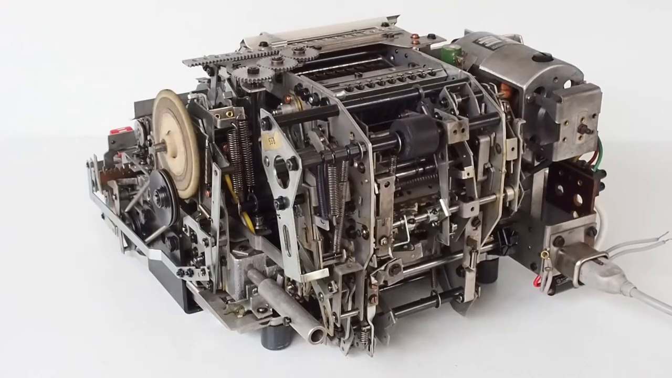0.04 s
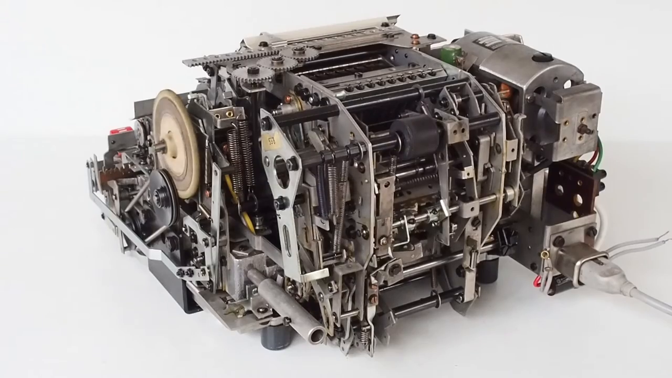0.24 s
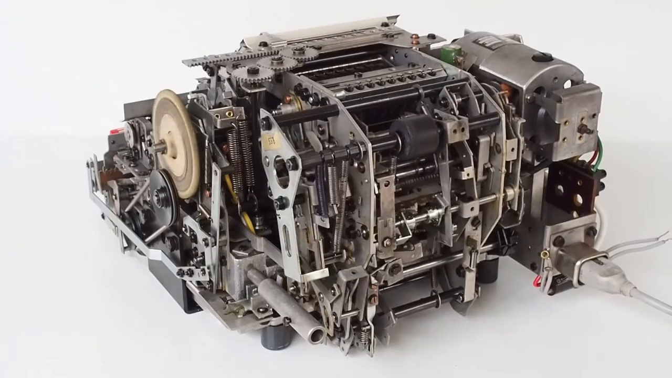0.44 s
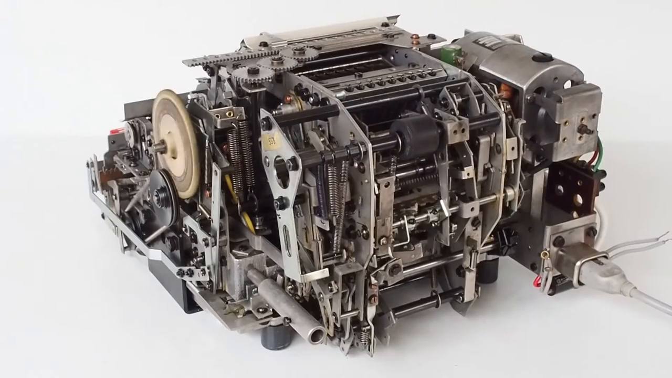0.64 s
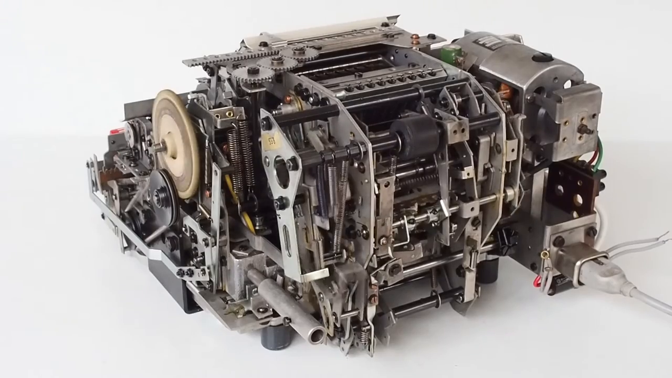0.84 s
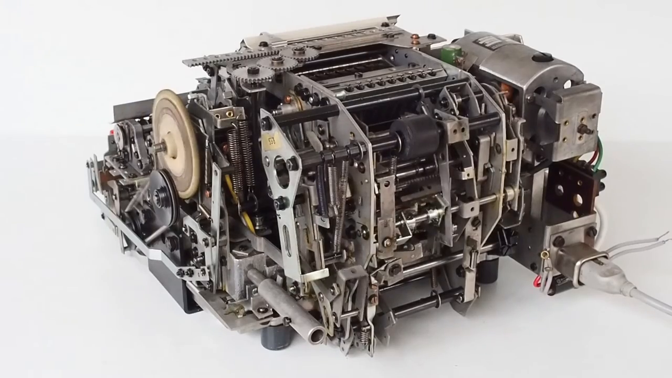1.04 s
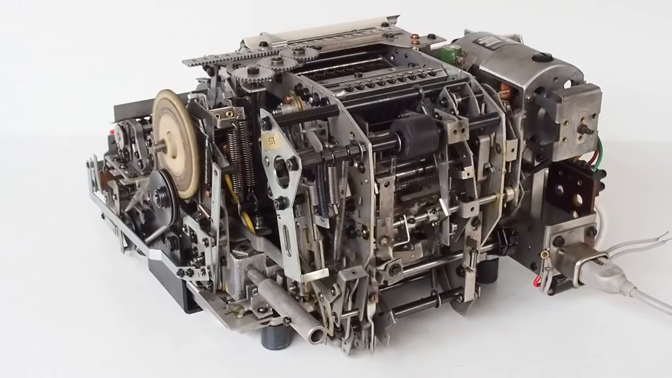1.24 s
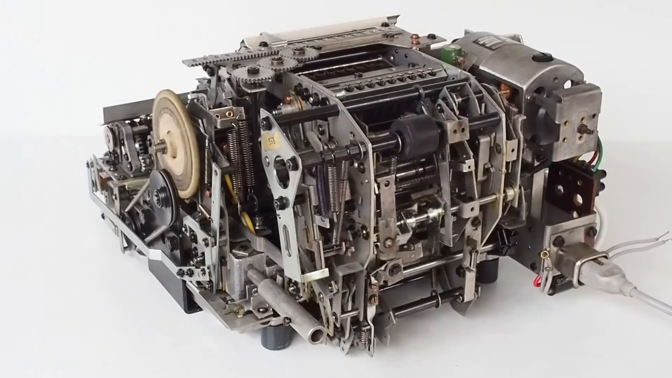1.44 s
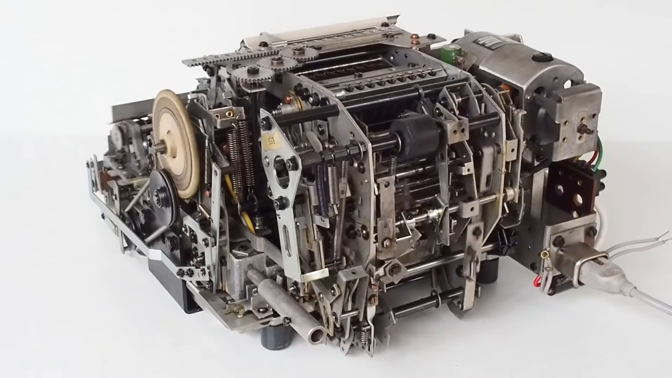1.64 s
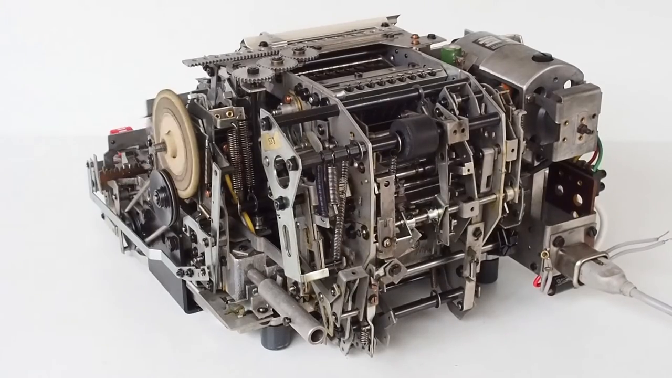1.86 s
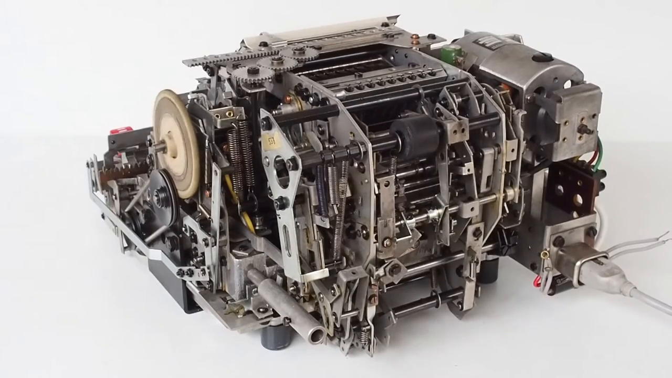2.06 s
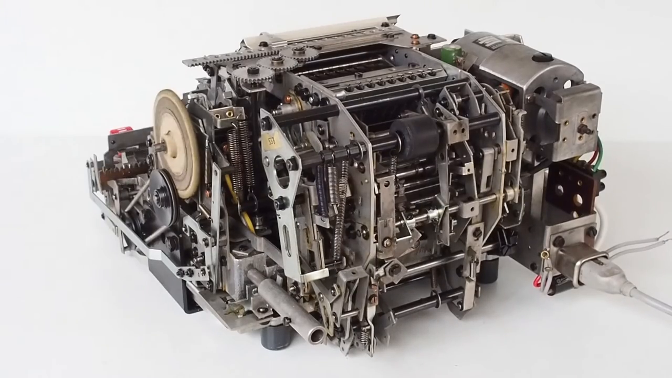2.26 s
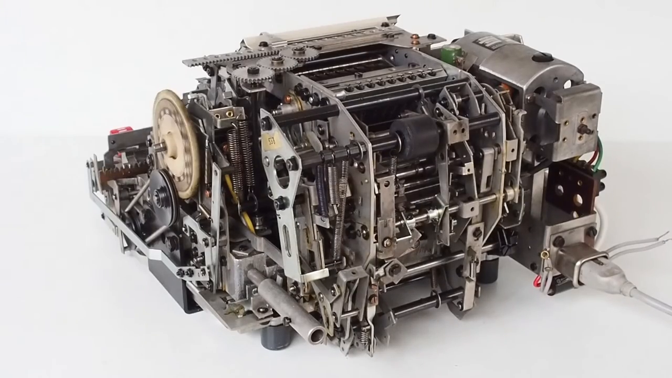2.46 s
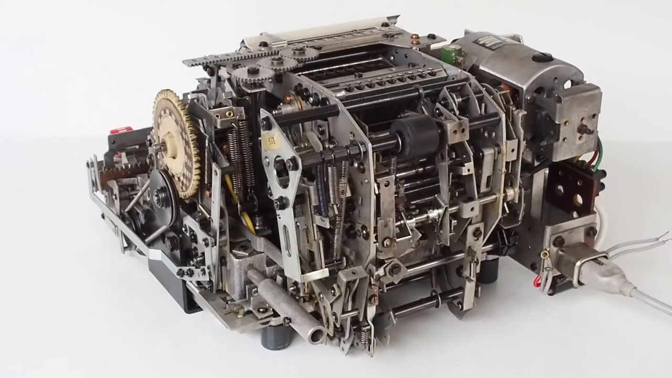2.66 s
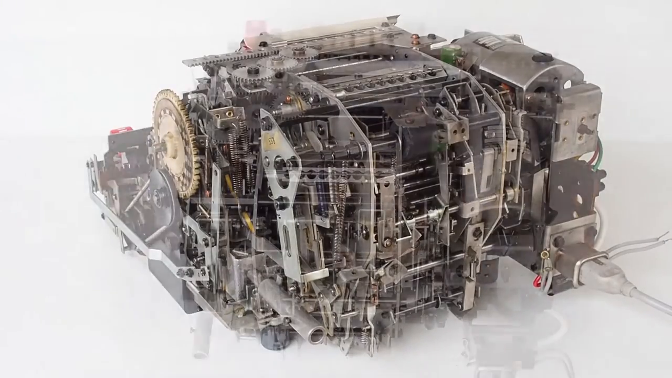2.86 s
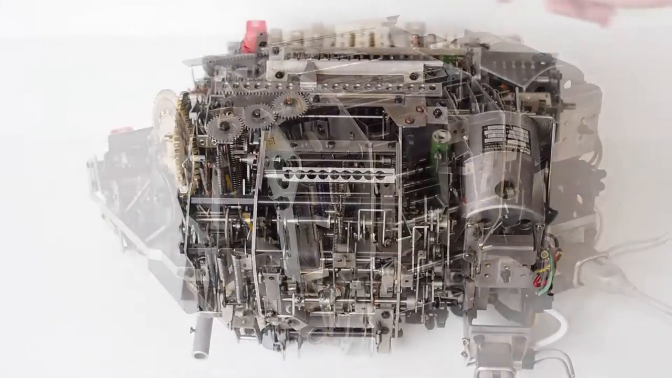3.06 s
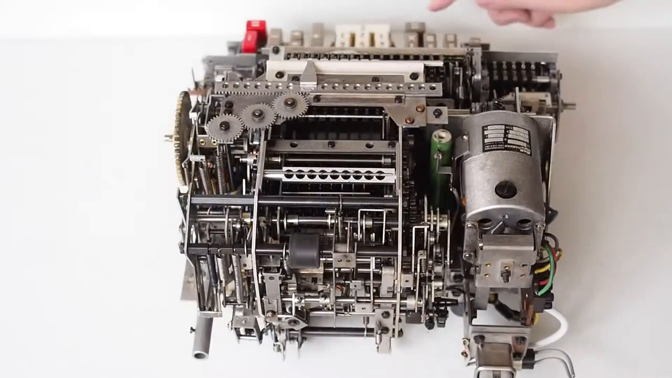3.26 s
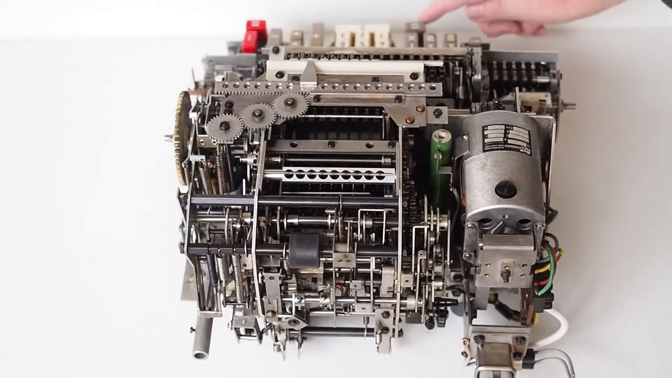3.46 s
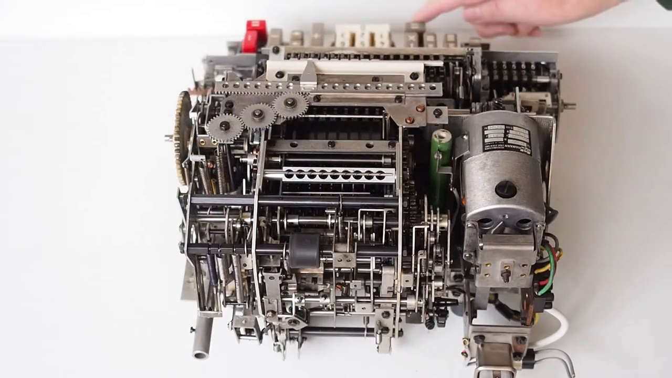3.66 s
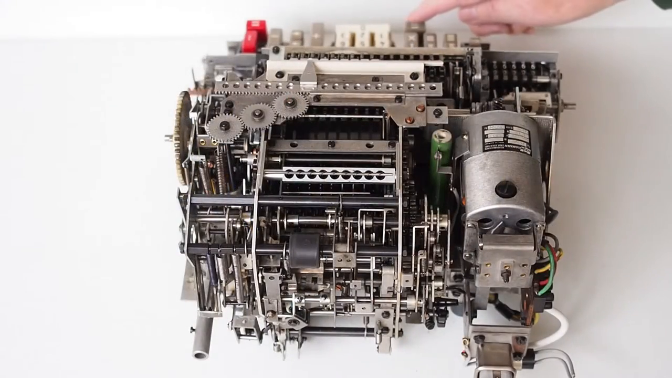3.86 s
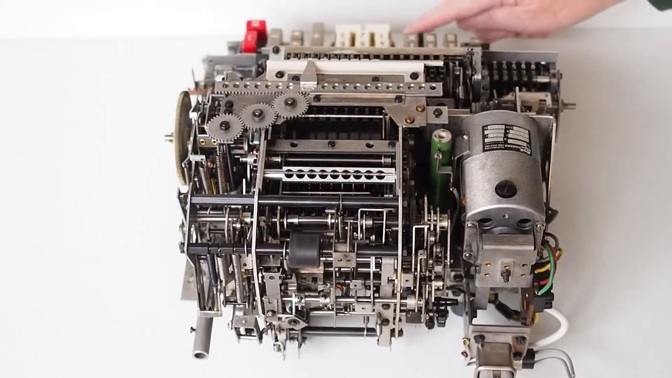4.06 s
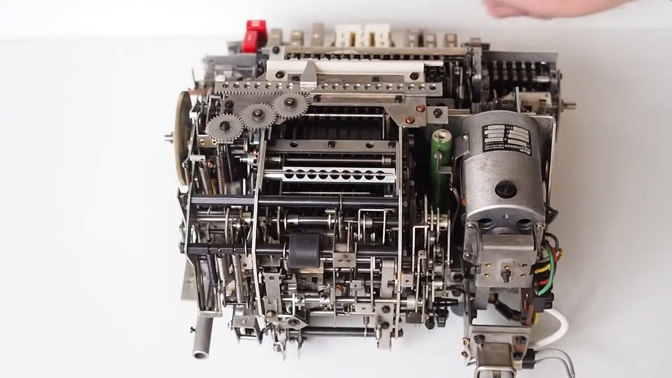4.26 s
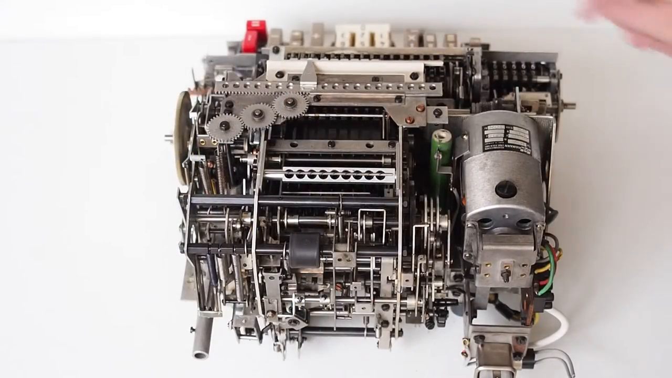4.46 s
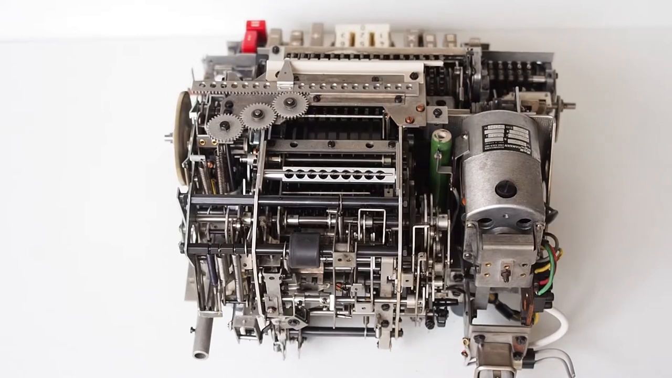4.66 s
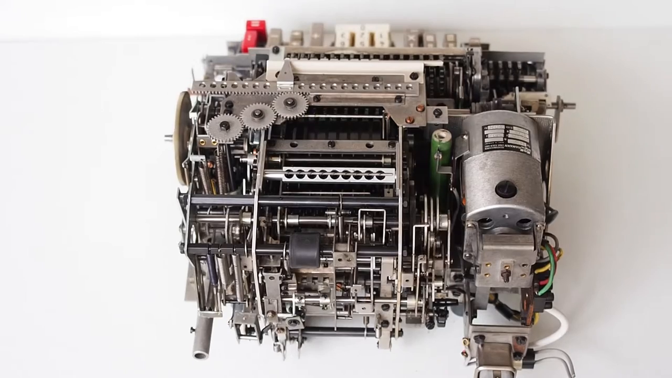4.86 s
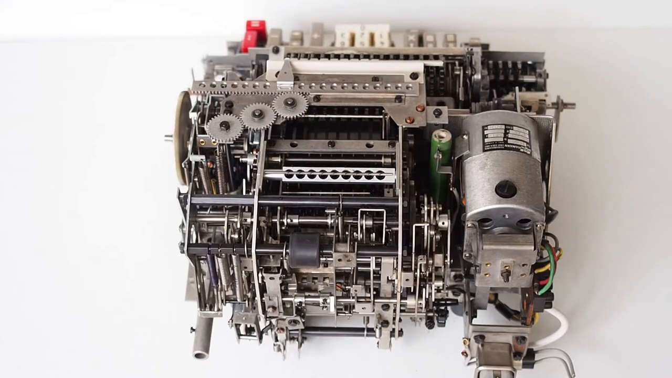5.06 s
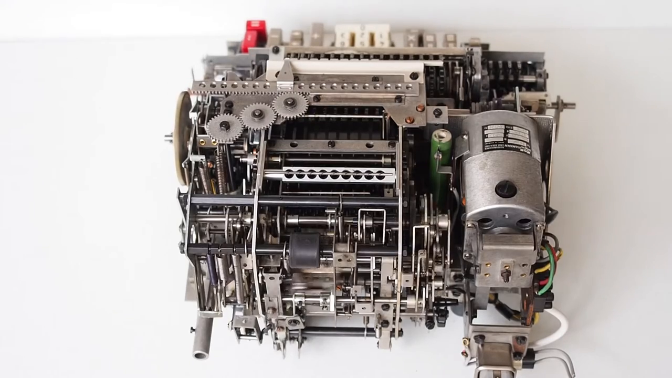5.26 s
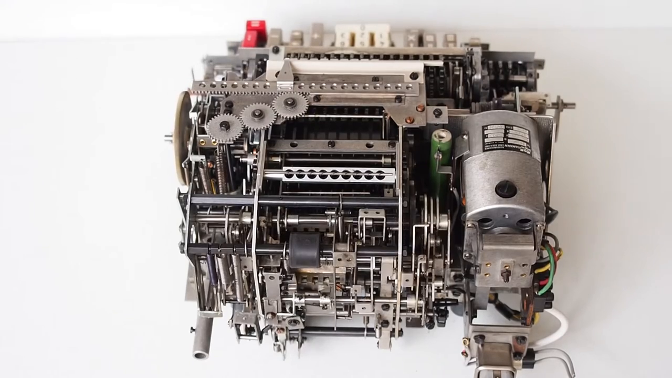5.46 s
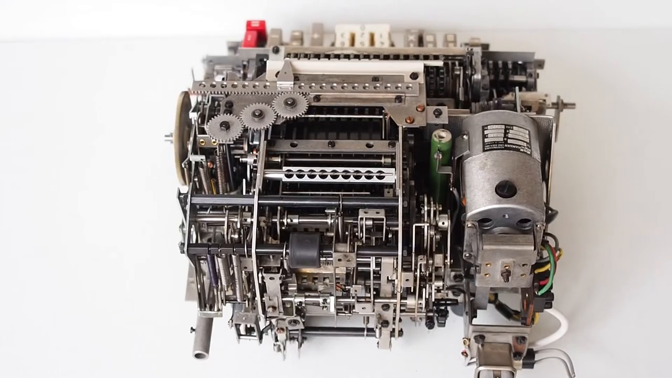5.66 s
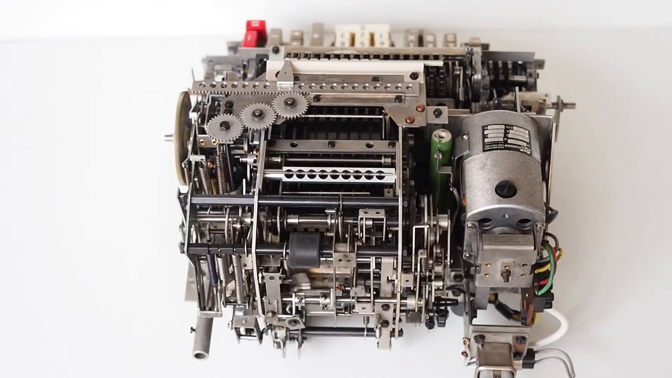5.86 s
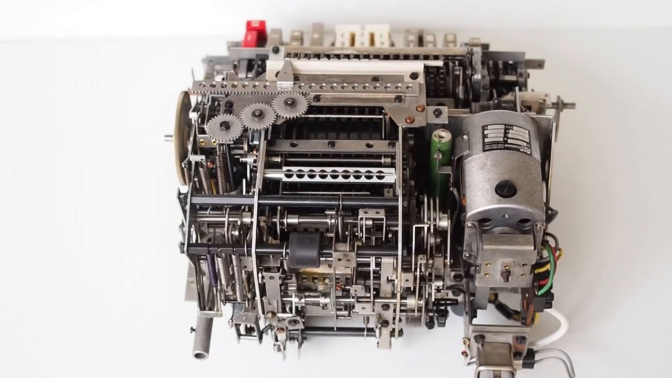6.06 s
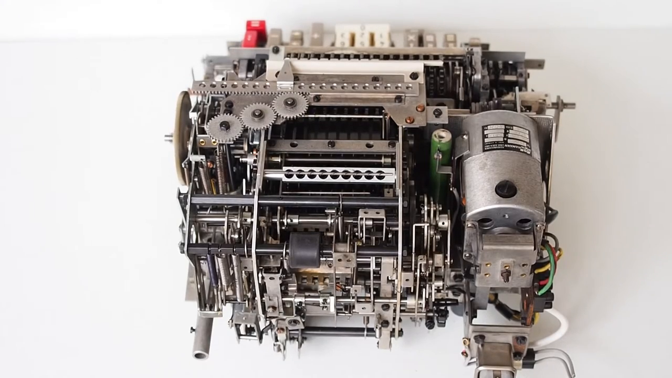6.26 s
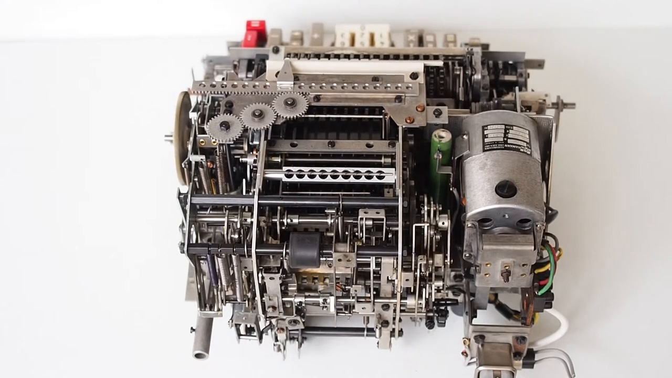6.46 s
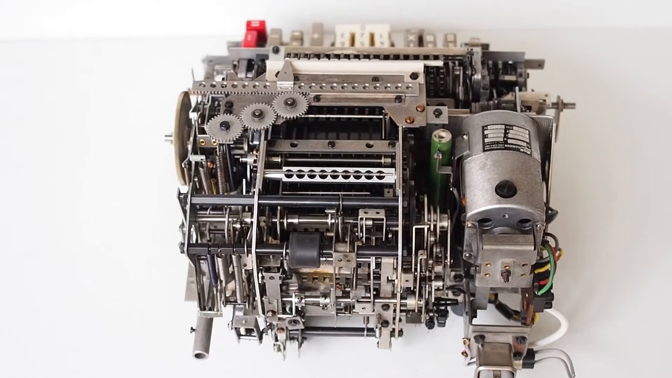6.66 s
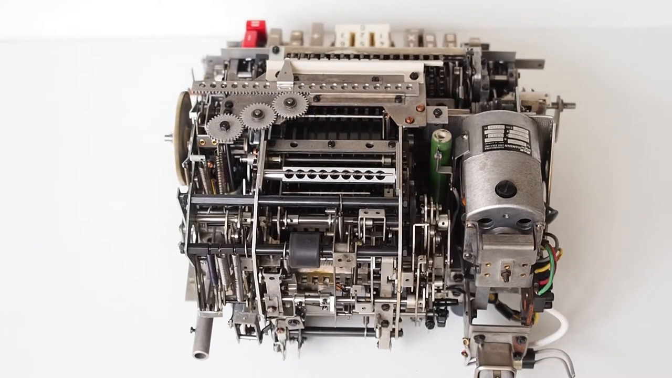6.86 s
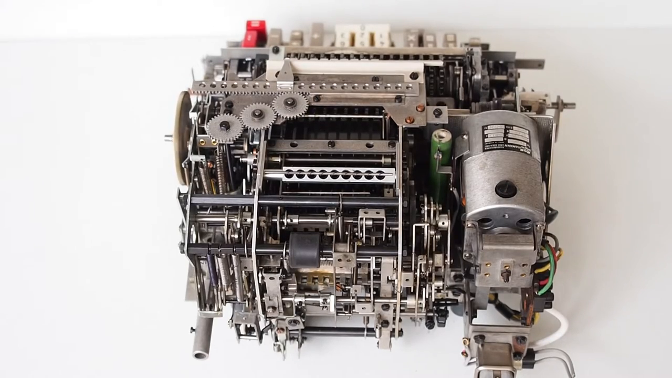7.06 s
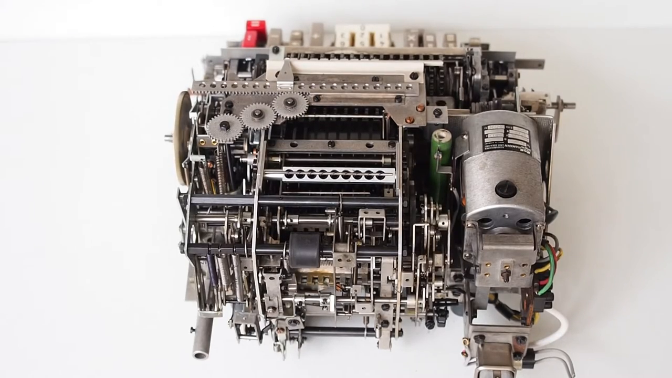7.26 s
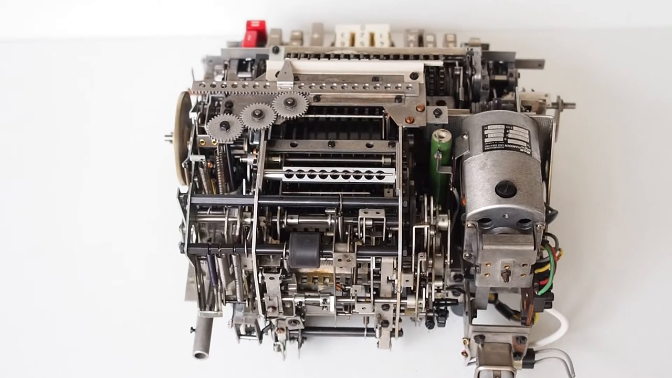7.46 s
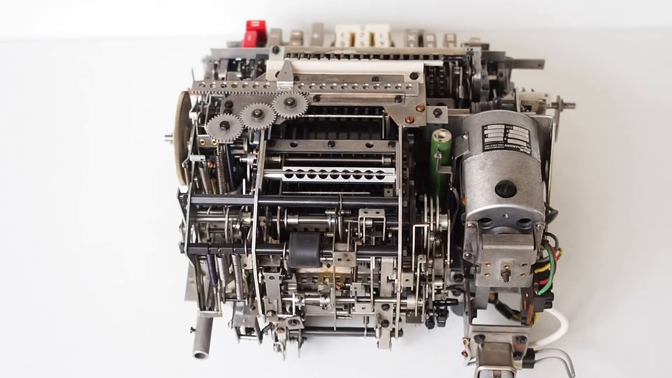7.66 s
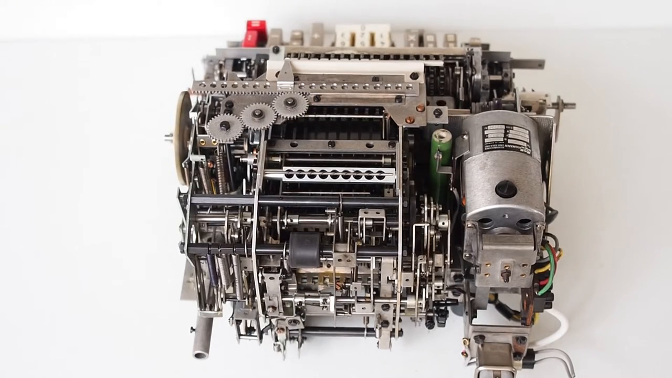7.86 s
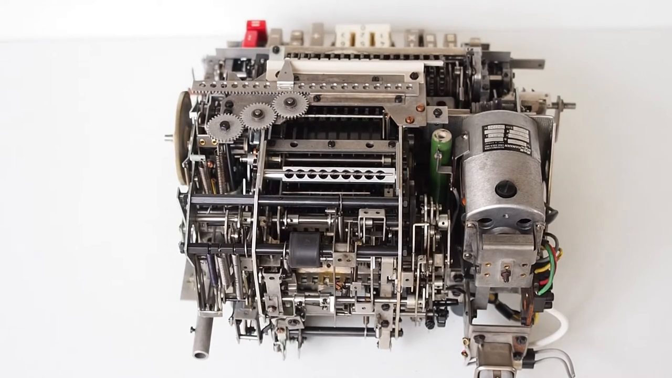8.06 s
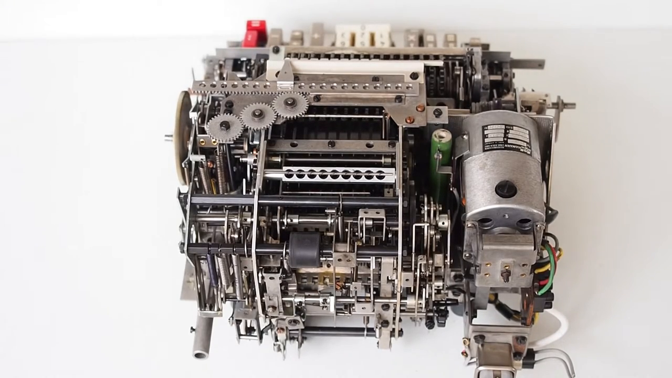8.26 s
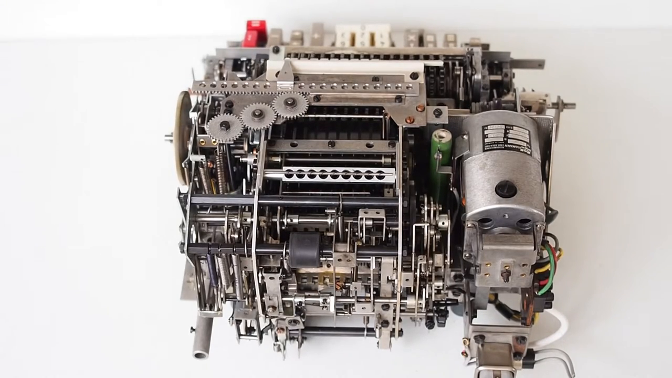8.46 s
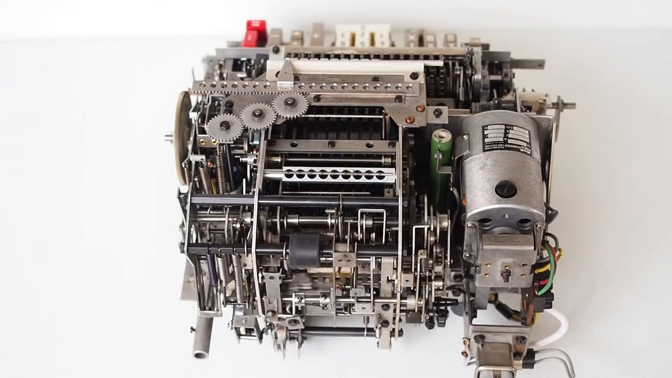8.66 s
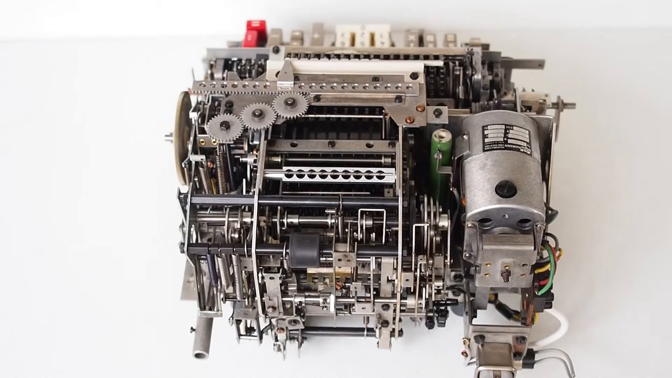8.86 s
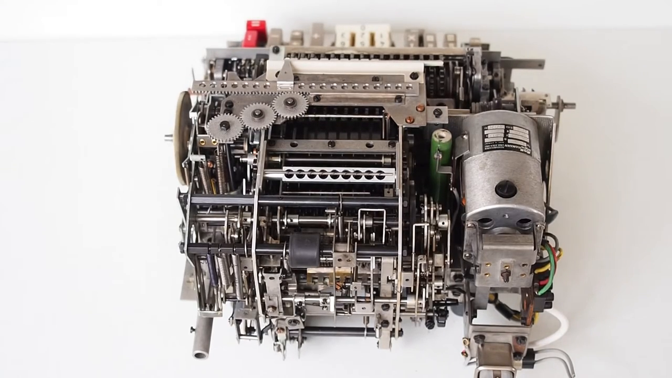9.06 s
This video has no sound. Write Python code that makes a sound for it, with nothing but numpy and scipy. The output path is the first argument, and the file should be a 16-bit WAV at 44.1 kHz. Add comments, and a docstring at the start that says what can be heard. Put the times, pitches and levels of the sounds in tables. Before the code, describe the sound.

Gears whirr and metal levers clack rhythmically as an electric mechanical calculator works, coasts to a stop, and restarts in a quiet room.

```python
"""A motor-driven mechanical calculator, cover off, works on a table in a quiet room. From the start its
motor hums and its gears whirr. Each turn of the main shaft throws rows of steel levers against their
stops, and the side plate booms. Near 2 s the carriage clicks along and hits its stop; the power goes
off and the machine coasts down. Near 4 s a key starts the next calculation: levers set up, the motor
pauses briefly, and from 5 s runs of clattering turns follow one another to the end."""
import sys
import numpy as np
from scipy.fft import rfft, irfft, next_fast_len
from scipy.io import wavfile
from scipy.ndimage import map_coordinates

SR = 44100
rng = np.random.default_rng(int(sys.argv[2]) if len(sys.argv) > 2 else 0)


def unload_audio(sound):
    """Save the sound as a 16-bit wav file, at the path given as the first command line argument."""
    columns = np.transpose(np.atleast_2d(sound))
    # keep every value between -1 and 1, then stretch to whole-number steps
    steps = np.round(np.clip(columns, -1, 1) * 32767)
    wavfile.write(sys.argv[1], SR, steps.astype(np.int16))


N = 402176
T = np.arange(N) / SR
SIZE = next_fast_len(N + SR, real=True)
HZ = np.fft.rfftfreq(SIZE, 1 / SR)
TOP_HZ = 15780


def amp(db):
    """Turn decibels into a number to multiply by."""
    return 10 ** (np.asarray(db) / 20)


def unit(x):
    """Scale a signal to an average power of 1."""
    return x / np.sqrt(np.mean(np.abs(x) ** 2) + 1e-20)


def along(points):
    """Join (pitch_hz, value) points into a curve over all pitches."""
    pitch_hz, values = np.transpose(points)
    return np.interp(np.log(HZ + 1), np.log(pitch_hz + 1), values)


def curves(rows, t=T):
    """Read each column after a table's time column at the times t."""
    time_s, *columns = np.transpose(rows)
    return [np.interp(t, time_s, column) for column in columns]


def wobble(rate):
    """A smooth random curve through `rate` new values a second."""
    return map_coordinates(rng.standard_normal(int(N * rate / SR) + 4), [T * rate])


def filtered(x, response):
    """Make each pitch in x louder or softer, as the response says."""
    return irfft(rfft(x, SIZE) * response, SIZE)[..., :N]


def colour(points):
    """A filter shaped by (pitch_hz, level_db) points that keeps the power of white noise."""
    cepstrum = irfft(np.log(amp(along(points))), SIZE)
    # folding makes the filter ring after a hit, never before it
    cepstrum[1:SIZE // 2] *= 2
    cepstrum[SIZE // 2 + 1:] = 0
    response = np.exp(rfft(cepstrum))
    return response / np.sqrt(np.mean(np.abs(response) ** 2 * (HZ < TOP_HZ)))


def resonances(notes, hz=HZ):
    """A filter that rings at each (pitch_hz, width_hz, level_db); narrow notes ring longer."""
    return sum(amp(db) * 1j * hz * width / (pitch ** 2 - hz ** 2 + 1j * hz * width)
               for pitch, width, db in notes)


# the room's tone: pitch_hz, level_db
ROOM_TONE = [(25, -19), (60, 3), (110, -1), (250, -5), (500, -8), (1500, -17), (2100, -22.5), (3500, -22),
             (5200, -30.5), (6600, -28), (10000, -29), (15500, -36)]
# the swell of its hiss: time_s, level_db
HISS_LEVELS = [(2.7, -51), (3.1, -46), (3.7, -50)]
def air(split_hz=1200, rumble_db=-54):
    """Faint room noise: a steady low rumble under a hiss that swells a little."""
    noise = unit(filtered(rng.standard_normal((2, N)), colour(ROOM_TONE)))
    hiss = filtered(noise, HZ ** 2 / (HZ ** 2 + split_hz ** 2))
    return (noise - hiss) * amp(rumble_db) + hiss * amp(curves(HISS_LEVELS)[0])


# when the motor has no power: off_s, on_s
POWER_OFF = [(2.2, 4.05), (4.811, 4.99)]
def coasting(t=T, spin_up_s=.015):
    """Seconds spent slowing down; the count falls quickly to zero when the power returns."""
    return sum(np.clip(t - off_s, 0, on_s - off_s) * np.exp(-np.maximum(t - on_s, 0) / spin_up_s)
               for off_s, on_s in POWER_OFF)


def motor_turns(full_speed_hz=146.8, sag_hz_per_s=45, sway=.0054):
    """Count the turns of the motor shaft, whose speed sways a little and sags when it coasts."""
    speed_hz = (full_speed_hz - sag_hz_per_s * coasting()) * (1 + sway * wobble(7))
    return np.cumsum(speed_hz) / SR


# how the running parts grow louder and softer: time_s, whirr_db, treble_db, drive_db, hum_db
RUNNING_LEVELS = [(0, -28, -23.5, -39.5, 2), (.6, -32, -28.5, -37.5, 3), (1.5, -32.5, -28.5, -41, 3),
                  (2.1, -32, -28, -37, 3.5), (4.2, -32, -32, -41, -1), (5.3, -33.5, -31, -45.5, 0.5),
                  (9.1, -33, -30.5, -42, 1)]
# the notes of the hum: cycles_per_turn, level_db
HUM_NOTES = [(1, -63), (2, -58), (3, -58)]
# the tone of the rumbling table: pitch_hz, level_db
TABLE_TONE = [(25, -12.5), (55, -29), (80, 1.5), (110, 1.5), (160, 4), (200, -2.5), (260, -14.5),
              (350, -35), (800, -52)]
def motor(turns, waver_db=2, hum_fade_db_per_s=170, rumble_db=-46.5, rumble_fade_db_per_s=18):
    """The motor hums at multiples of its speed while the machine rumbles on the table."""
    hum = sum(amp(db + waver_db * wobble(12)) * np.sqrt(2) * np.sin(2 * np.pi * cycles * turns)
              for cycles, db in HUM_NOTES)
    hum *= amp(curves(RUNNING_LEVELS)[3] - hum_fade_db_per_s * coasting())
    rumble = unit(filtered(rng.standard_normal((2, N)), colour(TABLE_TONE)))
    rumble *= amp(rumble_db - rumble_fade_db_per_s * coasting())
    return rumble + hum * np.array([[1], [0]])  # the hum sits in the middle


def steel_ring(fade_s, attack_s, uneven_db):
    """A steel part rings at so many pitches that it sounds like noise; it drops 60 dB in fade_s."""
    t = np.arange(SR // 2) / SR
    hz = np.fft.rfftfreq(len(t), 1 / SR)
    own_tone = amp(uneven_db * map_coordinates(rng.standard_normal(50), [49 * np.sqrt(hz / hz[-1])]))
    ring = irfft(rfft(rng.standard_normal((2, len(t)))) * own_tone, len(t))
    ring *= amp(-60 * t / fade_s) * (1 - np.exp(-t / attack_s))
    return ring / np.linalg.norm(ring, axis=1, keepdims=True)


# the tone of steel hit flat, and hit on an edge: pitch_hz, level_db
BODY_TONE = [(100, -28.5), (230, -7), (360, -15.5), (560, -10), (780, -5), (1150, -2), (1450, 0.5),
             (1880, -3), (2020, -3.5), (2300, 1.5), (4300, 1.5), (5300, -5), (6300, -13), (7500, -13),
             (10000, -31)]
EDGE_TONE = [(3500, -34.5), (5600, -12.5), (7100, -2), (9000, 0), (10500, 0), (12000, 0.5), (13800, 1),
             (15700, -4)]
# the notes the frame rings at: pitch_hz, width_hz, level_db
FRAME_NOTES = [(764, 21, -1.5), (848, 16, -5), (1402, 12, -11.5), (1706, 37, -4), (1840, 23, -6),
               (3640, 41, -1), (4490, 100, -8.5), (9500, 26, -18), (14020, 120, -29)]
def strike(times, parts, body, edge, snap_s, attack_s, ring_s, ring_db, side_db, uneven_db):
    """Each hit lands on one of a few steel parts: a snap, then the ring of the works and the room."""
    samples = np.clip(times * SR, 0, N).astype(int)
    body_tone = colour(BODY_TONE)
    edge_tone = np.abs(colour(EDGE_TONE)) * body_tone / np.abs(body_tone)  # rings in step with the body
    spectrum = 0
    for part in np.unique(parts):
        body_hits = rfft(np.bincount(samples, body * (parts == part)), SIZE)
        edge_hits = rfft(np.bincount(samples, edge * (parts == part)), SIZE)
        snap = steel_ring(snap_s, attack_s, uneven_db) * amp([[0], [side_db]])
        ring = steel_ring(ring_s, attack_s, uneven_db) * amp(ring_db)
        spectrum += (body_hits * body_tone + edge_hits * edge_tone) * rfft(snap + ring, SIZE)
    return irfft(spectrum * (1 + resonances(FRAME_NOTES)), SIZE)[:, :N]


def gear_levels(t, load_db=.5, whirr_fade_db_per_s=70, treble_fade_db_per_s=60):
    """The whirr is louder while the gears drive the main shaft; whirr and treble fade as they coast."""
    loaded = sum(np.abs(t - stroke_s - TURN_S / 4) < TURN_S / 2 for stroke_s, *_ in MAIN_TURNS)
    whirr_db, treble_db = curves(RUNNING_LEVELS, t)[:2]
    return (whirr_db + load_db * loaded - whirr_fade_db_per_s * coasting(t),
            treble_db - treble_fade_db_per_s * coasting(t))


# the tone of the gear case: pitch_hz, level_db
GEAR_CASE_TONE = [(300, -1), (1000, 2), (2500, 0), (4200, -1.5), (5200, -8), (6300, -1), (7400, -4),
                  (12800, -1), (14600, -6)]
def gears(turns, scatter_db=3, throb_db=2.5, gain_db=-1.53, count=30000):
    """Gear teeth tick so fast that they whirr, harder at one point of every motor turn."""
    times = (np.arange(count) + rng.random(count)) / count * N / SR
    throb = throb_db * np.sin(2 * np.pi * np.interp(times, T, turns + .21 * wobble(50)))
    force = unit(amp(scatter_db * rng.standard_normal(count) + throb)) * np.sqrt(N / count)
    force *= rng.choice([-1, 1], count)
    whirr_db, treble_db = gear_levels(times)
    wheels = rng.integers(4, size=count)
    ticks = strike(times, wheels, force * amp(whirr_db), force * amp(treble_db),
                   snap_s=.01, attack_s=.00049, ring_s=.12, ring_db=-6.5, side_db=-2, uneven_db=1.5)
    return filtered(ticks, amp(along(GEAR_CASE_TONE) + gain_db))


def drive(turns, pitch_hz=1720, width_hz=520, throb_db=2, fade_db_per_s=60):
    """The drive that gears the motor down whirrs around one pitch, throbbing with each motor turn."""
    whirr = filtered(rng.standard_normal((2, N)), resonances([(pitch_hz, width_hz, 0)]) ** 2)
    throb = amp(throb_db * np.sin(2 * np.pi * turns))
    return unit(whirr * throb) * amp(curves(RUNNING_LEVELS)[2] - fade_db_per_s * coasting())


TURN_S = .183  # one turn of the main shaft
# each turn of the main shaft: stroke_s, feed_db, stroke_db, carry_db, boom_db
MAIN_TURNS = [(.111, -24.5, -19.5, -26.5, -32), (.292, -29, -22, -26.5, -30.5),
              (.667, -22.5, -19, -24, -32.5), (.852, -27.5, -19.5, -25, -41), (1.245, -23.5, -21, -27, -33),
              (5.069, -32, -25.5, -34, -39.5), (5.257, -24, -24.5, -25.5, -46),
              (5.646, -22, -21.5, -22.5, -32), (5.831, -21, -22.5, -23, -34),
              (6.226, -21.5, -23, -24, -27.5), (6.409, -24.5, -21.5, -27.5, -27),
              (6.594, -20.5, -21, -21.5, -26), (6.971, -23.5, -21.5, -28.5, -25.5),
              (7.156, -22.5, -21, -24, -25.5), (7.338, -27, -23.5, -27.5, -26.5),
              (7.520, -21, -21.5, -22.5, -29.5), (7.705, -31.5, -27, -43, -42),
              (7.886, -20.5, -22, -26, -23), (8.072, -34.5, -24, -32, -30), (8.254, -33.5, -21, -29, -25.5),
              (8.436, -32, -22, -26.5, -26), (8.621, -26, -20.5, -23.5, -26.5),
              (8.999, -23.5, -20.5, -30, -26)]
# the cams, bumps on the shaft that each throw a row of levers, by name: delay_s, length_s, treble_db
CAM_THROWS = {"clutch": (-.055, .014, -4), "feed": (-.018, .013, 3.9), "stroke": (0, .013, 4.4),
              "carry": (.024, .014, 2.2), "settle": (.052, .02, -1), "return": (.106, .032, 3.6)}
def lever_rows(clutch_db=-25, settle_gain_db=-2.5, return_db=-30, last_return_db=-24.5):
    """Every turn works the same cams; the clutch bites before a run and the last return is hardest."""
    stroke_s, feed_db, stroke_db, carry_db, _ = np.transpose(MAIN_TURNS)
    first, last = run_ends()
    throws = {"clutch": (stroke_s[first], np.full(first.sum(), clutch_db)),
              "feed": (stroke_s, feed_db),
              "stroke": (stroke_s, stroke_db),
              "carry": (stroke_s, carry_db),
              "settle": (stroke_s, carry_db + settle_gain_db),
              "return": (stroke_s, np.where(last, last_return_db, return_db))}
    return [(turn_s + delay_s, length_s, level_db, treble_db)
            for cam, (delay_s, length_s, treble_db) in CAM_THROWS.items()
            for turn_s, level_db in zip(*throws[cam])]


def run_ends():
    """Mark which turns open and which close a run of back-to-back turns."""
    pause = np.diff(np.transpose(MAIN_TURNS)[0]) > 1.5 * TURN_S
    return np.r_[True, pause], np.r_[pause, True]


# extra lever rattles from setting up, shifting or a long carry, and one faint rub as the drive
# coasts down: start_s, length_s, level_db, treble_db (added to level_db)
EXTRA_RATTLES = [(1.586, .013, -32, 5.5), (1.622, .02, -25, 5), (1.673, .014, -22, -1),
                 (2.136, .011, -18.5, -3.5), (2.149, .01, -31.5, 11), (2.457, 0.054, -60, -5),
                 (4.168, .009, -26.5, 2.5), (4.188, .032, -24, 8), (4.226, .014, -26.5, 13.5),
                 (4.402, .0099, -26.5, 5.5), (4.501, .023, -31, 1.5), (4.588, .02, -22, 7.5),
                 (4.728, .07, -27.5, 4.5), (4.996, .0093, -32, -3.5), (7.807, .03, -28, -17),
                 (7.921, .05, -22.5, 2)]
def levers(scatter_db=3, edge_db=-1.34, edge_scatter_db=3, spread=2, lead_s=.002, count=32):
    """The levers of a row hit their stops one after another, hardest in the middle of the row."""
    start_s, length_s, level_db, treble_db = np.transpose(lever_rows() + EXTRA_RATTLES)[..., None]
    place = (np.arange(count) + rng.random((len(start_s), count))) / count - .5  # 0 is mid-row
    times = start_s + length_s * (.5 + spread * place) - lead_s
    force = amp(scatter_db * rng.standard_normal(times.shape)) / (1 + (4.13 * place) ** 2)
    force *= amp(level_db) * np.sqrt(length_s * SR) / np.linalg.norm(force, axis=1, keepdims=True)
    # some levers land flat and dull, others on an edge
    treble_db = treble_db + rng.normal(edge_db, edge_scatter_db, times.shape)
    # a row strikes three neighbouring parts out of nine, so each stroke has its own ring
    parts = (np.arange(len(start_s))[:, None] + rng.integers(3, size=times.shape)) % 9
    return strike(times.ravel(), parts.ravel(), force.ravel(), (force * amp(treble_db)).ravel(),
                  snap_s=.0095, attack_s=.00035, ring_s=.32, ring_db=-1.5, side_db=-12, uneven_db=3)


# the machine thumping on the table: start_s, pitch_hz, level_db
TABLE_THUMPS = [(.10, 157, -40), (0.291, 146, -37.5), (0.419, 160, -39), (0.651, 169.4, -36.5),
                (0.839, 156.2, -35.5), (0.972, 149, -38.5), (1.219, 162.7, -33), (1.617, 150.7, -40.5),
                (4.119, 107, -36), (5.84, 166, -43), (8.609, 163, -35)]
def thumps(fade_s=.26, attack_s=.014, gain_db=9):
    """The machine rocks on its rubber feet, making a short low note each time."""
    sound = np.zeros(N + SR)
    t = np.arange(SR // 2) / SR
    for start_s, pitch_hz, level_db in TABLE_THUMPS:
        swing = amp(level_db + gain_db - 60 * t / fade_s) * (1 - np.exp(-t / attack_s))
        sound[int(start_s * SR):][:len(t)] += swing * np.sin(2 * np.pi * (pitch_hz * t + rng.random()))
    return sound[:N]


# the notes the side plate rings at: pitch_hz, width_hz, level_db
PLATE_NOTES = [(991, 12, 11.5), (1089, 23, 6.5), (1285, 45, -14), (1400, 37, -14)]
def side_plate(gain_db=26, shudder_db=-2, fade_s=.17, detune=.041):
    """Each stroke or carriage bounce sets the side plate booming with a different mix of its notes."""
    t = np.arange(SR // 4) / SR
    hz = np.fft.rfftfreq(len(t), 1 / SR)
    sound = np.zeros(N + SR)
    strokes = [(stroke_s, boom_db) for stroke_s, *_, boom_db in MAIN_TURNS]
    for start_s, level_db in strokes + carriage_bounces():
        shudder = rng.standard_normal(len(t)) * amp(-60 * t / fade_s)
        shudder *= amp(shudder_db) / np.linalg.norm(shudder)
        shudder[0] += 1  # the blow itself
        notes = unit(resonances(PLATE_NOTES, hz * (1 + detune * rng.uniform(-1.07, 1))))
        boom = irfft(rfft(shudder) * notes, len(t))
        sound[int(start_s * SR):][:len(t)] += amp(level_db + gain_db) * boom
    return sound[:N]


def pawl(pitch_hz=11350, fade_s=.024, attack_s=.00061, level_db=-14, lead_s=.052):
    """A small steel catch pings, short and very high, whenever the shaft runs on into another turn."""
    t = np.arange(SR // 10) / SR
    ping = np.sin(2 * np.pi * pitch_hz * t) * amp(-60 * t / fade_s) * (1 - np.exp(-t / attack_s))
    first, _ = run_ends()
    start_s = np.transpose(MAIN_TURNS)[0][~first] - lead_s
    hits = np.bincount((start_s * SR).astype(int))
    return amp(level_db) * filtered(hits, rfft(ping, SIZE))


# the key and single latches, most of them ending a run: start_s, level_db, treble_db (added to level_db)
LATCH_CLICKS = [(.467, -26.5, 1.5), (1.04, -19.5, -1), (1.427, -19.5, -2), (1.603, -26, 5),
                (4.056, -34, -9), (4.108, -30.5, 10), (4.322, -31, -14), (4.661, -27, 13), (4.879, -36, 4),
                (5.436, -27.5, 6), (6.022, -25, 5), (6.781, -24.5, 4), (8.796, -24.5, 2)]
def latches(bounce_s=.004, loss_db=4, gain_db=22, count=4):
    """A latch, the key or the carriage ratchet snaps home and chatters, each bounce weaker."""
    start_s, level_db, treble_db = np.transpose(LATCH_CLICKS + carriage_steps())[..., None]
    bounce = np.arange(count)
    jitter = (rng.random((len(start_s), count)) - .5) * (bounce > 0)
    times = start_s + bounce_s * (bounce + jitter)
    force = amp(level_db + gain_db - loss_db * bounce)
    parts = rng.integers(3, size=times.size)
    return strike(times.ravel(), parts, force.ravel(), (force * amp(treble_db)).ravel(),
                  snap_s=.02, attack_s=.0005, ring_s=.3, ring_db=-2.5, side_db=-7, uneven_db=3.5)


def carriage_steps(start_s=1.768, step_s=.0643, first_db=-25.5, rise_db=.75, treble_db=-6.5, count=6):
    """The carriage clicks along its ratchet in even steps, each a little harder than the one before."""
    return [(start_s + k * step_s, first_db + k * rise_db, treble_db) for k in range(count)]


def carriage_bounces(start_s=2.138, bounce_s=.021, first_db=-23, loss_db=3.5, count=4):
    """The carriage hits its stop and bounces, more weakly each time."""
    return [(start_s + k * bounce_s, first_db - k * loss_db) for k in range(count)]


# how wide each pitch spreads between left and right: pitch_hz, side_db
STEREO_WIDTH = [(100, -21), (250, -13), (500, -10.5), (1000, -11), (2000, -4), (4000, -1), (14000, -1.5)]
def scene():
    """Mix it all: mid is what both ears share, side is how they differ. Bass is central, clatter wide."""
    turns = motor_turns()
    mid, side = levers() + latches() + gears(turns) + drive(turns) + motor(turns) + air()
    mid = mid + side_plate() + thumps() + pawl()
    side = filtered(side, amp(along(STEREO_WIDTH)))
    return np.array([mid + side, mid - side])


# the balance of the two microphones: pitch_hz, left_minus_right_db
MIC_BALANCE = [(100, 0), (500, -0.8), (2000, -2), (4000, -0.5), (10000, 0.7)]
def record(dry, ceiling=.95):
    """The microphones lean a little to one side, round off the peaks and hear nothing above TOP_HZ."""
    lean_db = along(MIC_BALANCE) / 2
    sound = filtered(dry, amp([lean_db, -lean_db]))
    sound = sound / (1 + (sound / ceiling) ** 6) ** (1 / 6)
    return filtered(sound, HZ < TOP_HZ)


dry = scene()
out = record(dry)
unload_audio(out)
```